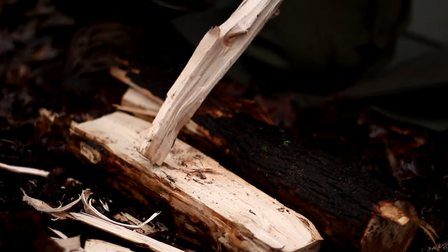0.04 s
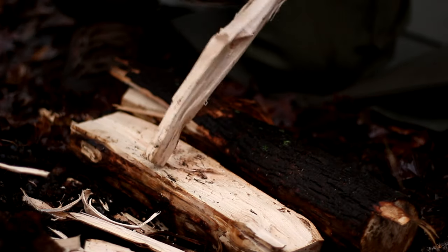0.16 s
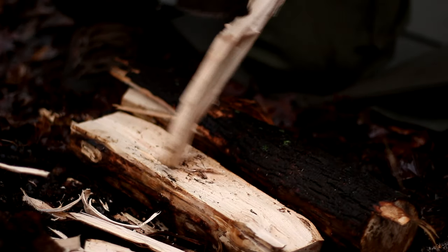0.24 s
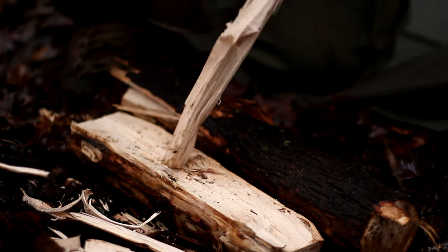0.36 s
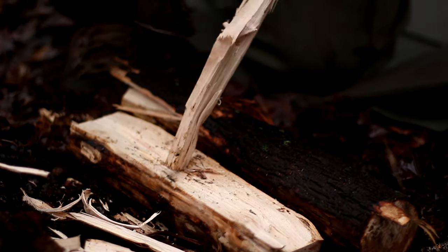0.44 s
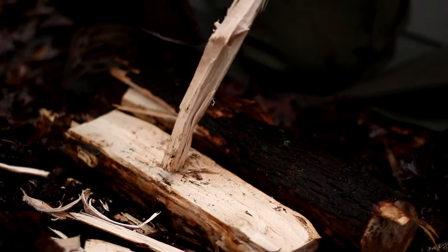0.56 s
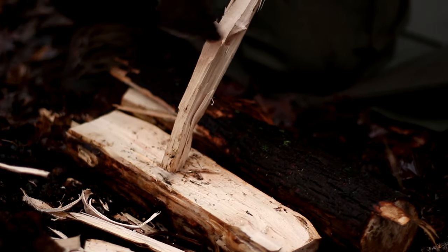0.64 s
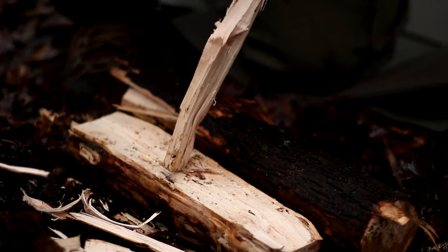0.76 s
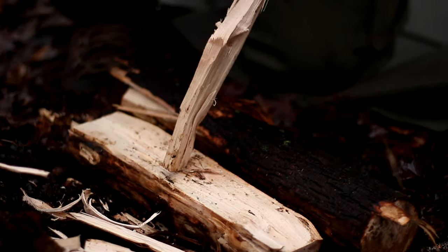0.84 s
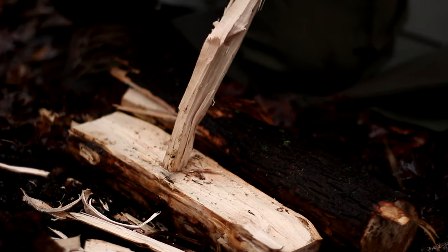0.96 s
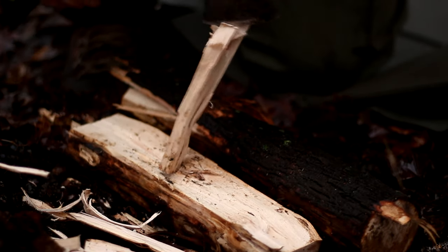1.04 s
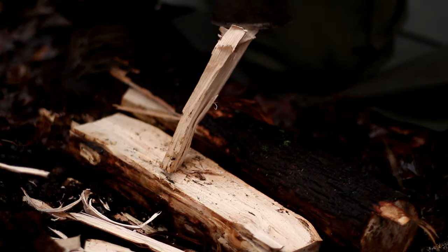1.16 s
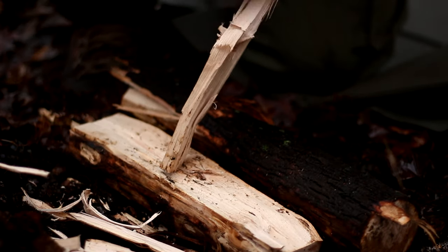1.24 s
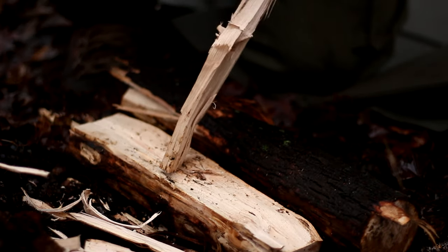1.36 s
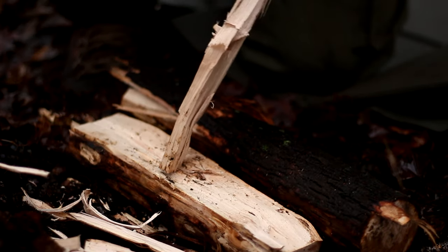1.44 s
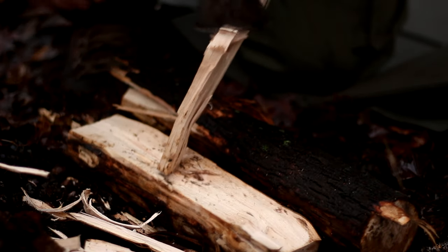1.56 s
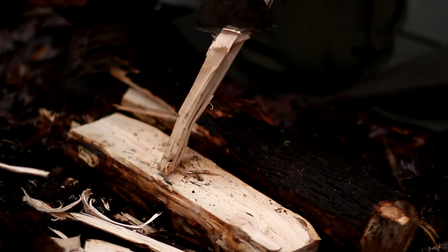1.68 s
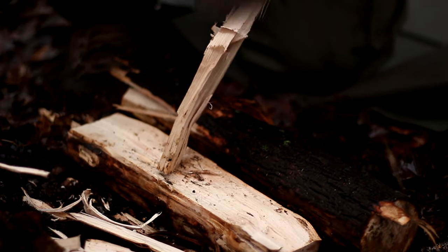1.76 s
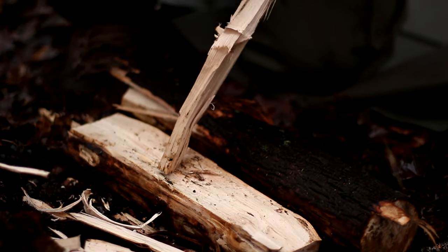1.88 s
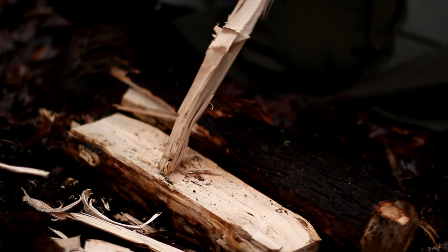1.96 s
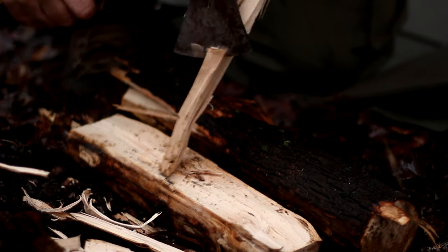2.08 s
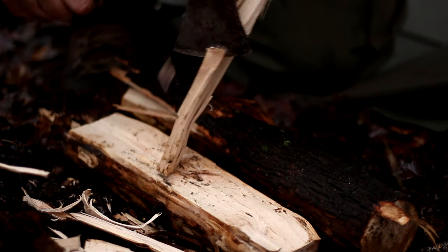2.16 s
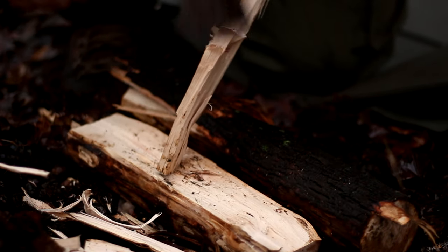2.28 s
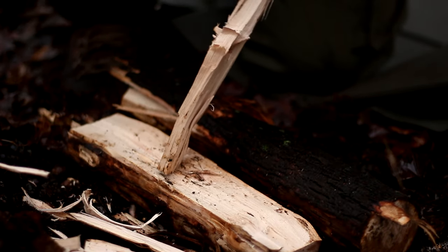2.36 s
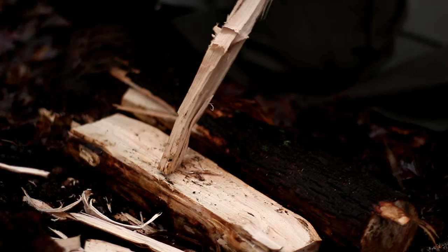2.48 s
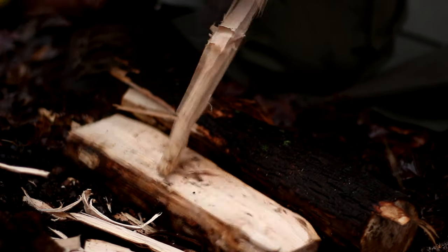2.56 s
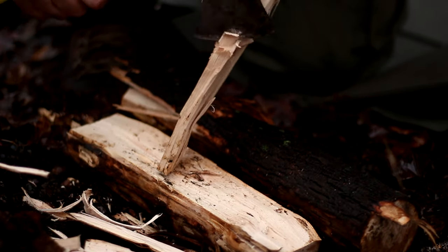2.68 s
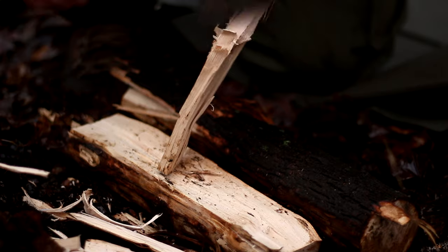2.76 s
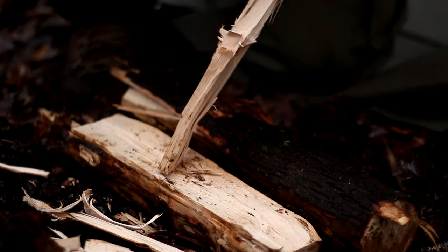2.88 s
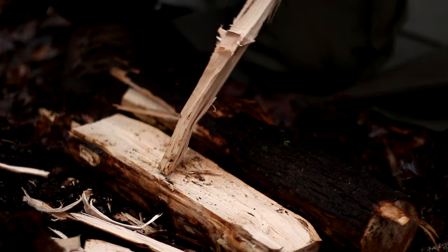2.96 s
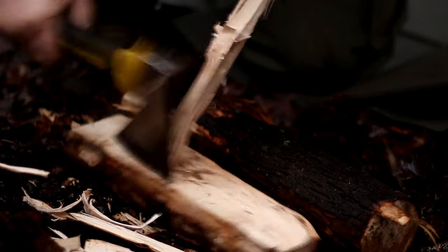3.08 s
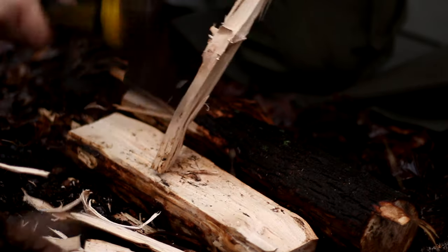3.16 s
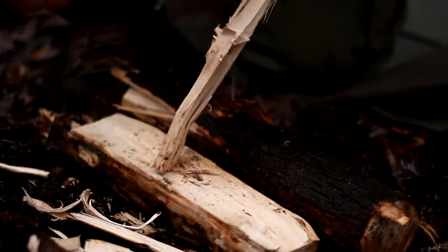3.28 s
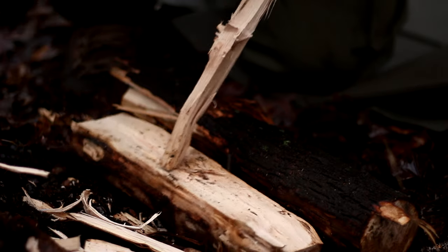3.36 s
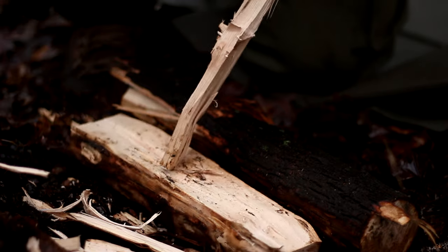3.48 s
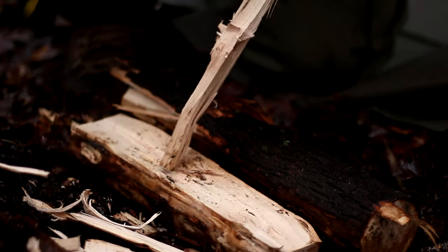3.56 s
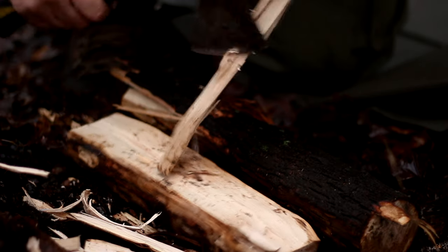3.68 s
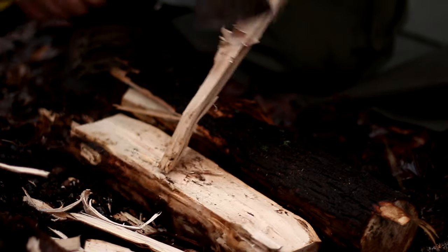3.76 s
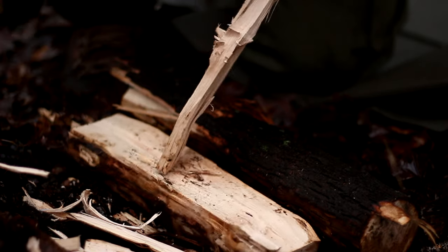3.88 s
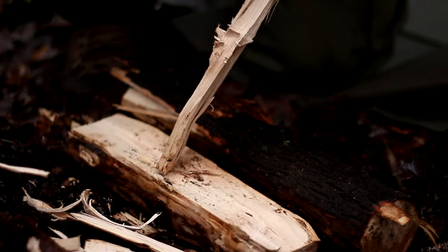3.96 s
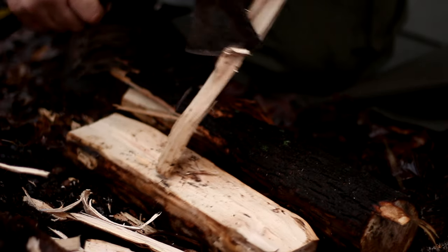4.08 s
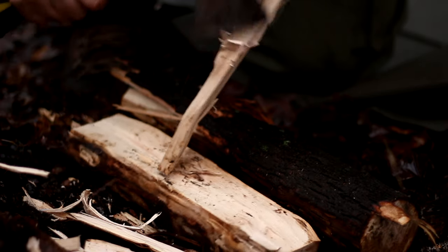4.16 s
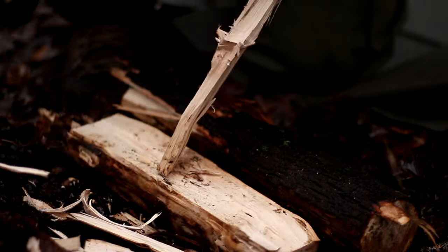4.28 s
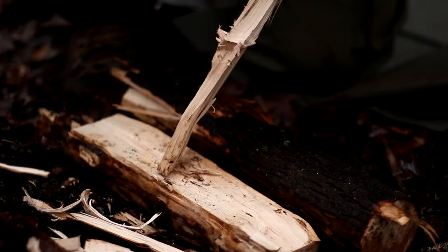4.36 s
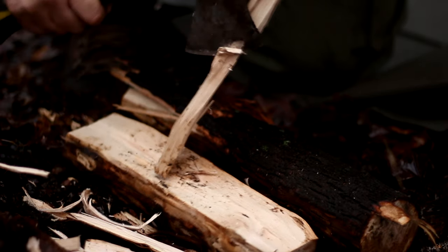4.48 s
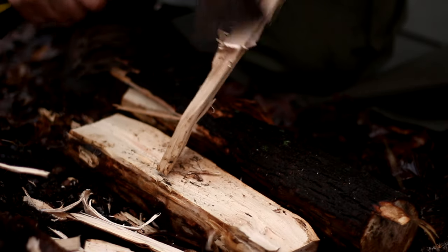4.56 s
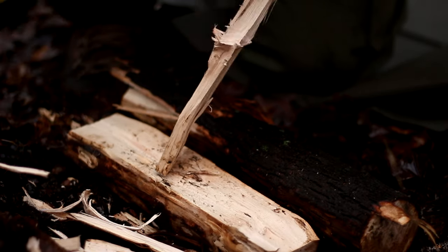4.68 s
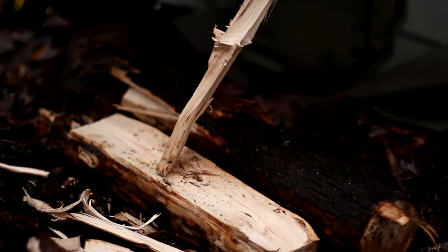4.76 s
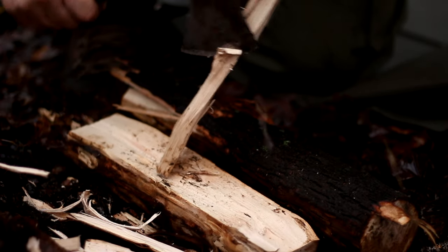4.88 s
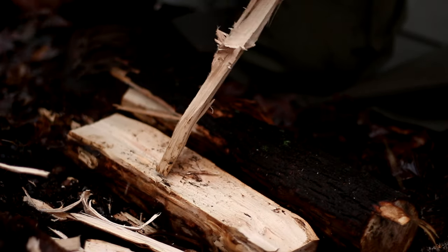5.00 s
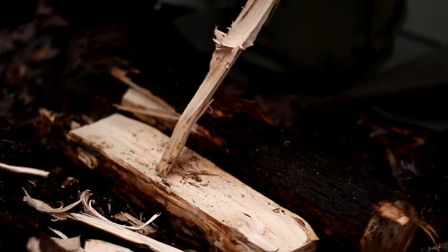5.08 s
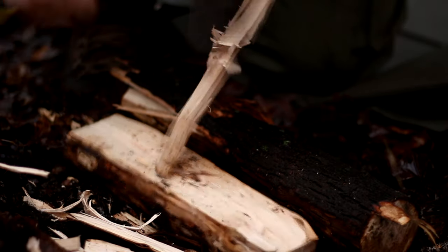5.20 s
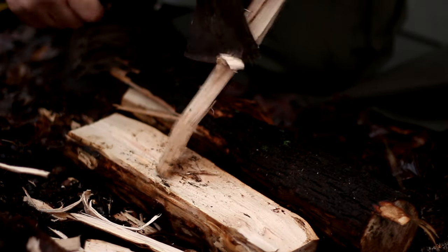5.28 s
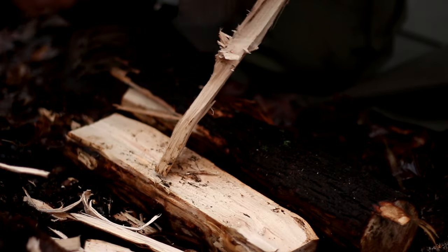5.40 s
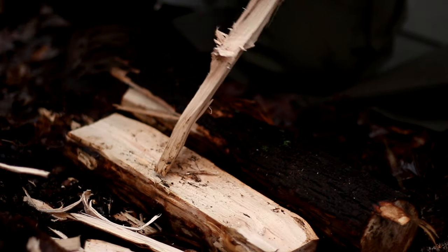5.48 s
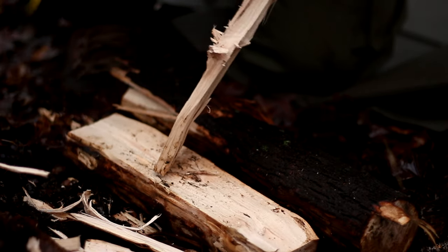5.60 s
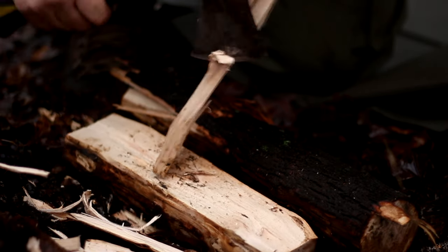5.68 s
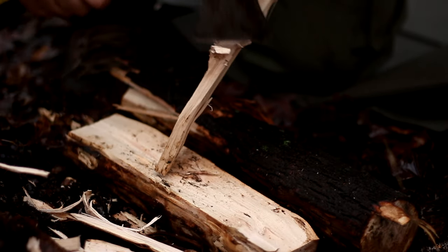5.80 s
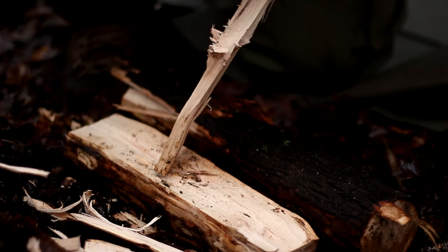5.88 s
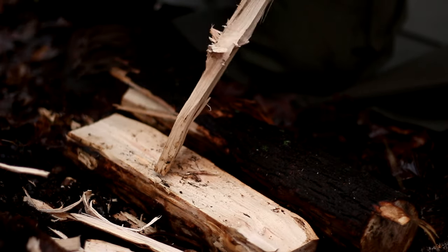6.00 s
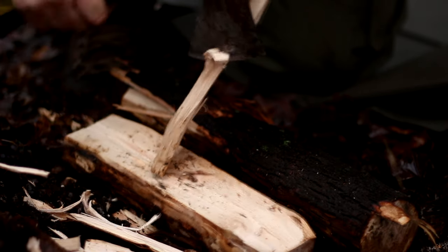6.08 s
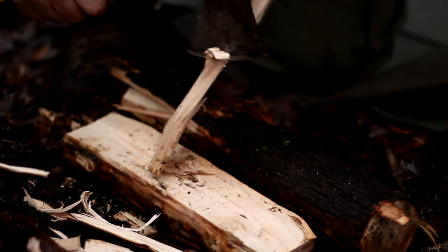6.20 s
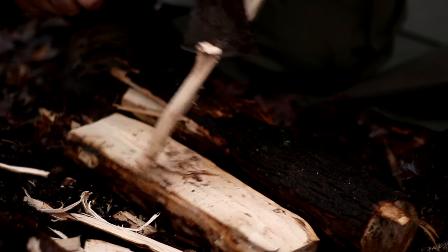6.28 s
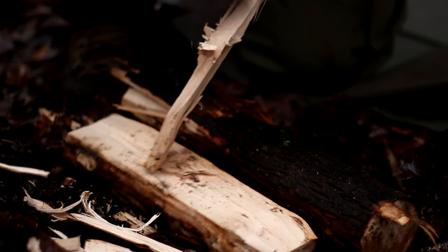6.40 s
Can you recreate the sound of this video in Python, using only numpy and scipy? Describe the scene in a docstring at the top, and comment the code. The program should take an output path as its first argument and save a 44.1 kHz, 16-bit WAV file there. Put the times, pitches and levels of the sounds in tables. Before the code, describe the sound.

A quiet forest background of low rumble and soft hiss runs throughout, with a very faint distant motor hum that recedes around 3 seconds. In the first second a stick rustles lightly in the hand. At 1.1 seconds a small hatchet starts chopping into the thin stick, which stands on a log. Twelve blows fall, half a second apart at first, quickening slightly after 4 seconds, the last at about 6.2 seconds. Each is a short, sharp woody knock with cracking fibres, a slight low thud and a faint echo from the trees. The hardest, brightest crack comes at 3.1 seconds, followed at once by the stick tapping the log. Between blows, splinters tick and the blade scrapes faintly; from about 4.5 seconds it rubs softly out of the cleft after each chop. The microphone is close and overloads slightly on the chops.

```python
"""Forest floor: a small hatchet chops twelve times into a thin stick standing on a split log.
Each blow knocks the stick against the log, cracks its fibres and thuds the log into the soil; the trees
answer faintly. Between blows splinters tick, the blade scrapes, the stick rustles and taps. A far motor
recedes over low rumble and hiss. The close, nearly mono microphone overloads on the chops."""
import sys
import numpy as np
from scipy import signal
from scipy.fft import rfft, irfft, next_fast_len
from scipy.io import wavfile

SR = 44100
rng = np.random.default_rng(int(sys.argv[2]) if len(sys.argv) > 2 else 0)


def log_audio(samples):
    """Write samples as a 16-bit WAV file to the path given in sys.argv[1]."""
    # one column per channel
    frames = np.atleast_2d(samples).T
    # limit to full scale, then quantise
    limited = np.clip(frames, -1, 1)
    pcm = np.round(limited * 32767).astype(np.int16)
    wavfile.write(sys.argv[1], SR, pcm)


N = 284004
HIT_S = np.arange(SR // 4) / SR  # time within one hit

# hatchet blows: start_s, bite_db, knock_db, knock_hz, treble_db, node_db, hollow_db, thud_db
BLOWS = [(1.1008, -47, -13, 1530, -5, -2.5, -37.5, -35.5), (1.6392, -43, -12, 1447, -2, -10.5, -35, -29),
         (2.148, -13.5, -12, 1528, 1, -20.5, -35.5, -39.5), (2.6586, -45, -13, 1384, -5, -8, -36.5, -35),
         (3.1236, -8, -15.5, 1500, -1.5, -8, -41, -46), (3.7086, -14.5, -27, 1470, -3.5, -4, -33.5, -36.5),
         (4.1282, -24, -11, 1450, 6, -3.5, -53.5, -39.5), (4.5423, -35, -10.5, 1520, -8, -6.5, -47, -35),
         (4.9178, -40, -11.5, 1417, 0.5, -5, -39.5, -33), (5.3043, -17, -11.5, 1577, 0, 1, -34, -29.5),
         (5.742, -44, -10.5, 1673, 2.5, 3, -32, -29.5), (6.155, -40, -12, 1494, -2, -8, -24, -30)]
# stick driven against the log, at knock_hz = 1500: mode_hz, level_db, t60_s
KNOCK_MODES = [(300, -11.5, 0.011), (747, -17.5, 0.019), (1245, -5.5, 0.019), (1541, 12.5, 0.0054),
               (1880, -3.5, .016)]
# log bouncing on soft ground: mode_hz, level_db, t60_s, rise_s
BOUNCE_MODES = [(74, -1.5, 0.061, .012), (56.3, -20, 0.16, 0.022)]
# stick's free ring: mode_hz, width_hz, level_db
STICK_MODES = [(1275, 110, 1), (1832, 59, 6.5), (2270, 110, -3), (3000, 200, -17), (3700, 700, -2.5),
               (4800, 310, -22)]
# loose stick tapping the log: start_s, peak_db
STICK_TAPS = [(3.174, -12), (3.687, -33.5)]
# ring of a tap, before its pitch ratio: nominal_hz, level_db, t60_s
CONTACT_MODES = [(480, -6.5, 0.0098), (704, 8.5, 0.0088), (1112, 0, 0.016), (1846, -3.5, 0.021),
                 (2350, -19, 0.031), (3020, -12, 0.013)]
# single fibres snapping: start_s, peak_db, centre_hz
FIBRE_SNAPS = [(0.6848, -43, 3500), (1.2906, -40.5, 9200), (1.8355, -31.5, 10300), (2.338, -35.5, 7000),
               (2.377, -33.5, 10000), (3.1516, -25, 3000), (3.296, -36.5, 6000), (3.839, -32.5, 6500),
               (4.189, -38, 10000)]
# blade rubbing on wood: middle_s, level_db, centre_hz
BLADE_SCRAPES = [(1.834, -58, 7000), (2.361, -44.5, 6500), (3.155, -40, 2980), (3.677, -46.5, 3620),
                 (4.227, -46.5, 8050)]
# stick shifted in the hand: start_s, length_s, level_db
GRIP_SHIFTS = [(0, 0.12, -53.5), (0.736, 0.22, -62), (1.055, .05, -55)]
# far motor's tones: centre_hz, width_hz, relative_db
MOTOR_TONES = [(156.1, 3, 8.5), (632, 12, -9.5)]
# noise spectra: freq_hz, relative_db
CRACK_SPECTRUM = [(400, -32.5), (900, -13.5), (1300, 0.5), (2000, -1.5), (3500, 4), (4400, -6), (5400, 0.5),
                  (8500, -5), (11000, -3), (16000, -18)]
TEAR_SPECTRUM = [(200, 0), (500, -6.5), (900, -8), (2000, -2), (4000, -6.5), (9000, -4.5), (11000, -9),
                 (16000, -13.5)]
RUSTLE_SPECTRUM = [(200, -16), (800, -1.5), (1800, 1.5), (4000, -5), (8000, -5), (12000, -14.5),
                   (16000, -24)]
ECHO_SPECTRUM = [(100, -22.5), (500, -13.5), (900, 0), (1400, 2), (1900, 3), (2500, 1.5), (3700, 1.5),
                 (7000, -2), (10000, -7.5), (15000, -22)]
RUMBLE_SPECTRUM = [(12, -32), (22, -1), (45, 1.5), (80, 3), (125, -8.5), (165, -10.5), (230, -19),
                   (400, -25.5), (520, -60), (880, -120)]
HISS_SPECTRUM = [(180, -31.5), (300, -10), (584, -6.5), (656, -7), (961, -13), (1150, -10.5), (2650, -13.5),
                 (3830, -13.5), (4440, -14.5), (15000, -16), (16000, -15.5)]
# left-right likeness of the background: freq_hz, correlation
STEREO_LIKENESS = [(60, 1.0), (180, 0.98), (550, 0.79), (1650, 0.7), (4970, 0.47), (15000, 0.17)]


def amp(db):
    """Decibels to gain."""
    return 10 ** (np.asarray(db) / 20)


def unit(x):
    """Scale to rms 1."""
    return x / np.sqrt(np.mean(x ** 2) + 1e-20)


def burst(x, length_s):
    """Scale a hit to the energy of an rms 1 sound of that length."""
    return x / np.sqrt(np.sum(x ** 2) / (length_s * SR) + 1e-20)


def along(points, hz):
    """Interpolate (freq_hz, value) points on a log axis."""
    freq_hz, values = np.transpose(points)
    return np.interp(np.log(hz + 1), np.log(freq_hz + 1), values)


def filtered(x, response):
    """Apply a frequency response."""
    size = x.shape[-1]
    padded = next_fast_len(size + 8192)
    return irfft(rfft(x, padded) * response(np.fft.rfftfreq(padded, 1 / SR)), padded)[..., :size]


def noise(spectrum, size, spiky_db=0):
    """Coloured noise, rms 1; spiky_db clumps it into 16-sample grains."""
    clumps = np.repeat(rng.standard_normal(size // 16 + 1), 16)[:size]
    white = rng.standard_normal(size) * amp(spiky_db * np.minimum(clumps, 2))
    return unit(filtered(white, lambda hz: amp(along(spectrum, hz))))


def tilted(spectrum, treble_db):
    """Shelve a spectrum: no change at 4 kHz, treble_db from 12 kHz."""
    return [(hz, db + treble_db * np.clip(np.log(hz / 4000) / np.log(3), 0, 1)) for hz, db in spectrum]


def hump(hz):
    """Broad spectrum of a small splinter, centred on hz."""
    return [(hz / 8, -25), (hz / 2, -4), (hz, 0), (2 * hz, -10), (4 * hz, -30)]


def bell(x, width):
    """Gaussian around 0."""
    return np.exp(-.5 * (x / width) ** 2)


def fade(t60_s, rise_s):
    """Exponential rise and decay."""
    return amp(-60 * HIT_S / t60_s) * (1 - np.exp(-HIT_S / rise_s))


def sine(hz):
    """Steady tone, one hit long."""
    return np.sin(2 * np.pi * hz * HIT_S)


def ring(modes, pitch_ratio):
    """Damped modes, all shifted by one ratio."""
    return sum(amp(db - 60 * HIT_S / t60_s) * sine(hz * pitch_ratio) for hz, db, t60_s in modes)


def add(track, start_s, x):
    """Mix x into the track."""
    i = max(round(start_s * SR), 0)
    track[i:i + len(x)] += x[:max(len(track) - i, 0)]


def background(spectrum):
    """Steady distant noise, wider in stereo towards the treble."""
    angle_rad = lambda hz: np.arccos(np.clip(along(STEREO_LIKENESS, hz), 0, 1)) / 2
    mid = filtered(noise(spectrum, N), lambda hz: np.cos(angle_rad(hz)))
    side = filtered(noise(spectrum, N), lambda hz: np.sin(angle_rad(hz)))
    return unit(np.array([mid + side, mid - side]))


def motor(level_db=-60.5, drop_db=6.5, recede_s=(2.55, 3.4)):
    """Narrow, wavering tones of a far motor that recedes."""
    def tones(hz):
        return sum(amp(db) / np.sqrt(width_hz) / (1 + ((hz - centre_hz) / width_hz) ** 2)
                   for centre_hz, width_hz, db in MOTOR_TONES)
    hum = unit(filtered(rng.standard_normal(N), tones))
    loss_db = np.interp(np.arange(N) / SR, recede_s, [0, drop_db])
    return amp(level_db - loss_db) * hum


def handling(attack_s=0.024, release_s=0.055):
    """The stick rustles as it shifts in the hand."""
    t = np.arange(N) / SR
    grip = np.zeros(N)
    for start_s, length_s, db in GRIP_SHIFTS:
        swell = np.clip((t - start_s) / attack_s, 0, 1)
        release = np.clip(1 - (t - start_s - length_s) / release_s, 0, 1)
        grip += amp(db) * swell * release
    return grip * noise(RUSTLE_SPECTRUM, N, spiky_db=3)


def fibres(settle_s=(0.1, 0.25), tick_db=-44, tick_hz=7900, spread_oct=0.25):
    """A few fibres snap; one ticks faintly after each chop as the split wood settles."""
    out = np.zeros(N)
    ticks = [(blow_s + rng.uniform(*settle_s), tick_db, tick_hz * 2 ** (spread_oct * rng.normal()))
             for blow_s, *_ in BLOWS]
    for start_s, peak_db, hz in FIBRE_SNAPS + ticks:
        snap = noise(hump(hz), len(HIT_S)) * fade(t60_s=0.023, rise_s=0.00032)
        add(out, start_s, amp(peak_db) * snap / np.abs(snap).max())
    return out


def cracking(treble_db, node_db, node_hz=2850, next_mode_hz=4350):
    """Wood cracks; a blow on a node of one mode loses that band and drives the next harder."""
    band = lambda hz, centre_hz: bell(np.log((hz + 1) / centre_hz), width=0.16)
    colour = lambda hz: amp(node_db * (band(hz, node_hz) - 0.32 * band(hz, next_mode_hz)))
    grains = noise(tilted(CRACK_SPECTRUM, treble_db), len(HIT_S), spiky_db=3)
    return unit(filtered(grains, colour))


def stick_response(hz):
    """The stick's resonances, alternating in sign."""
    return sum((-1) ** k * amp(db) * 1j * hz * width_hz / (mode_hz ** 2 - hz ** 2 + 1j * hz * width_hz)
               for k, (mode_hz, width_hz, db) in enumerate(STICK_MODES))


def chop(start_s, bite_db, knock_db, knock_hz, treble_db, node_db, hollow_db, thud_db):
    """The edge bites, the stick slams onto the log, cracks, tears and rings; the log rebounds."""
    crack_db, tear_db, ring_db = -9, -35.5, knock_db - 25
    bite = cracking(treble_db, node_db) * fade(t60_s=0.0088, rise_s=0.00042)
    knock = ring(KNOCK_MODES, pitch_ratio=knock_hz / 1500)
    crack = cracking(treble_db, node_db) * fade(t60_s=0.0071, rise_s=0.0001)
    tear = noise(tilted(TEAR_SPECTRUM, treble_db), len(HIT_S)) * fade(t60_s=0.055, rise_s=0.0011)
    splitting = rng.standard_normal(len(HIT_S)) * fade(t60_s=0.044, rise_s=0.0005)
    stick_ring = filtered(splitting, stick_response)
    hollow_log = sine(hz=192) * fade(t60_s=0.03, rise_s=0.00085)
    bounce = sum(-amp(db) * fade(t60_s, rise_s) * sine(hz) for hz, db, t60_s, rise_s in BOUNCE_MODES)
    out = np.zeros(N)
    add(out, start_s - 0.0008, amp(bite_db) * burst(bite, length_s=0.0021))
    add(out, start_s, amp(knock_db) * burst(knock, length_s=0.0091))
    add(out, start_s + 0.0009, amp(crack_db) * burst(crack, length_s=0.0051))
    add(out, start_s + 0.000997, amp(ring_db) * burst(stick_ring, length_s=0.056))
    add(out, start_s + 0.0023, amp(tear_db) * burst(tear, length_s=0.066))
    add(out, start_s + 0.0027, amp(thud_db) * burst(bounce, length_s=0.021))
    add(out, start_s + 0.003, amp(hollow_db) * burst(hollow_log, length_s=0.012))
    return out


def forest(direct, echo_db, woody_db, t60_s=1.1):
    """Echoes from the trunks add in power: a soft wash, tinged by the stick's ring."""
    grove_delay_s, grove_width_s, grove_db = 0.1, 0.025, -3.5  # a stand of trees answers together
    t = np.arange(SR) / SR
    grove = amp(grove_db) * bell(t - grove_delay_s, grove_width_s)
    arrivals = amp(-60 * t / t60_s) ** 2 + grove ** 2
    power = np.abs(signal.fftconvolve(direct ** 2, arrivals / arrivals.sum())[:N])
    wash = noise(ECHO_SPECTRUM, N, spiky_db=1.5)
    woody = unit(filtered(rng.standard_normal(N), stick_response))
    return amp(echo_db) * np.sqrt(power) * (wash + amp(woody_db) * woody)


def blade(head_hz=6800, steel_db=-2, width_s=0.008):
    """The blade rubs in the cleft; harder scrapes nearer the head's pitch ping the steel more."""
    # once the cleft is deep, the blade is drawn out after each chop
    deep_from_s, pull_delay_s, pull_db, pull_hz = 4.4, 0.09, -50, 10500
    pulls = [(blow_s + pull_delay_s, pull_db, pull_hz) for blow_s, *_ in BLOWS if blow_s > deep_from_s]
    out = np.zeros(N)
    swell = bell(HIT_S - HIT_S.mean(), width_s)
    for middle_s, db, hz in BLADE_SCRAPES + pulls:
        scrape = swell * noise(hump(hz), len(HIT_S), spiky_db=8.5)
        add(out, middle_s - HIT_S.mean(), amp(db) * scrape)
        ping_db = db + steel_db + along(hump(hz), head_hz)
        add(out, middle_s - width_s, amp(ping_db) * fade(t60_s=0.16, rise_s=0.004) * sine(head_hz))
    return out


def taps(contact_rise_s=0.0013):
    """The loosened stick drops softly back on the log."""
    out = np.zeros(N)
    for start_s, peak_db in STICK_TAPS:
        click = 0.16 * noise(RUSTLE_SPECTRUM, len(HIT_S)) * fade(t60_s=0.014, rise_s=0.00017)
        tap = ring(CONTACT_MODES, pitch_ratio=0.97) + click
        tap *= 1 - np.exp(-HIT_S / contact_rise_s)
        add(out, start_s, amp(peak_db) * tap / np.abs(tap).max())
    return out


def scene():
    """All sources dead centre, over stereo rumble and hiss."""
    chopping = sum(chop(*blow) for blow in BLOWS)
    small_sounds = handling() + taps() + fibres() + blade()
    centre = chopping + forest(chopping, echo_db=-29.5, woody_db=-8) + small_sounds + motor()
    return centre + amp(-50.5) * background(RUMBLE_SPECTRUM) + amp(-57) * background(HISS_SPECTRUM)


def record(dry):
    """The input stage flattens the peaks; a steep low-pass limits the band."""
    ceiling, top_hz = 0.62, 16100
    clipped = dry / (1 + np.abs(dry / ceiling) ** 8) ** (1 / 8)
    return filtered(clipped, lambda hz: 1 / np.sqrt(1 + (hz / top_hz) ** 120))


dry = scene()
out = record(dry)
log_audio(out)
```